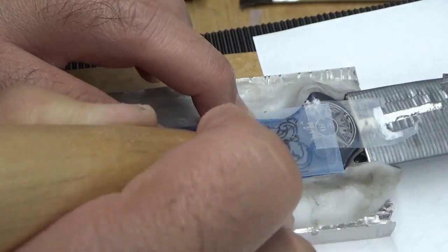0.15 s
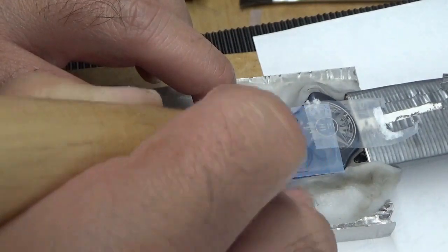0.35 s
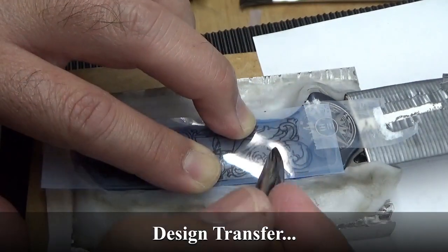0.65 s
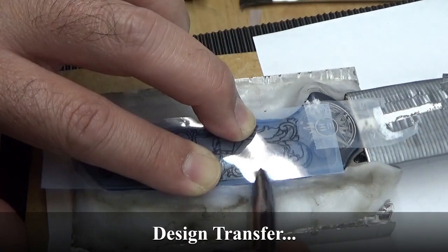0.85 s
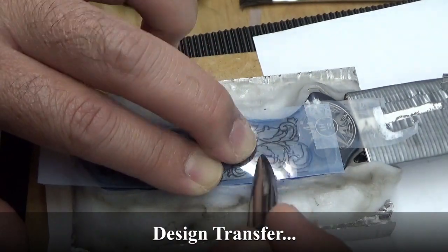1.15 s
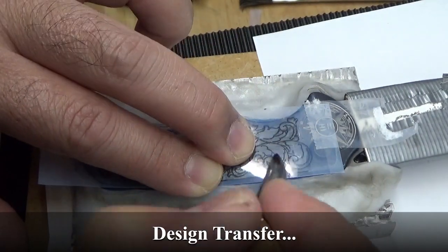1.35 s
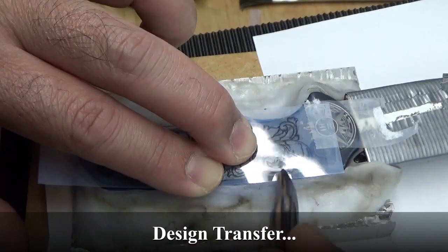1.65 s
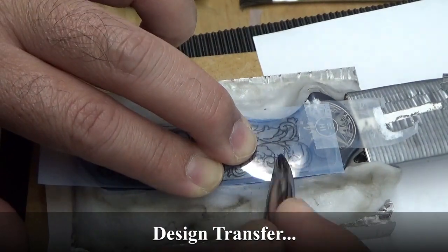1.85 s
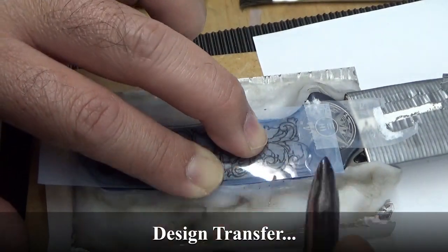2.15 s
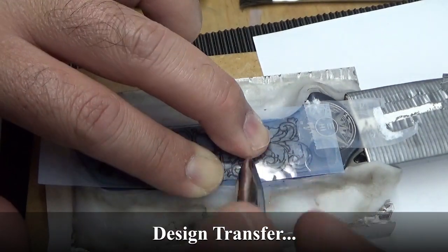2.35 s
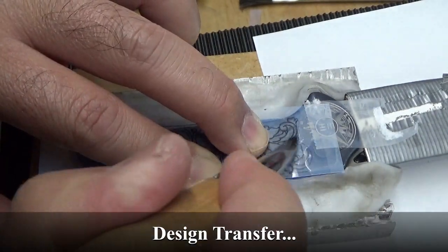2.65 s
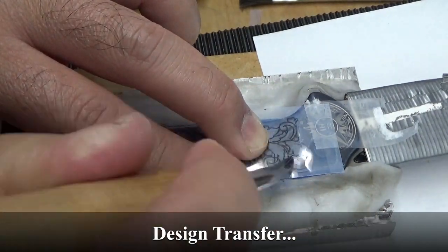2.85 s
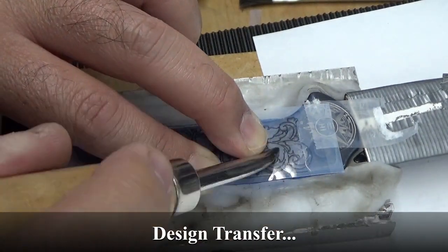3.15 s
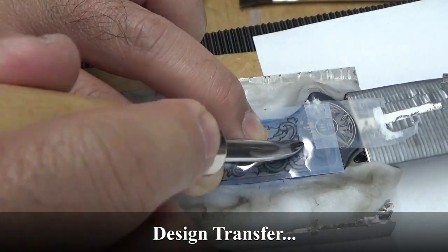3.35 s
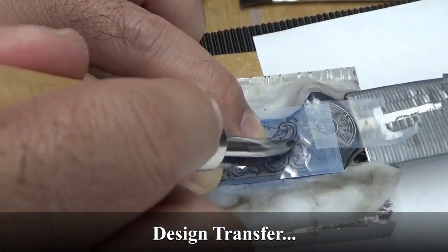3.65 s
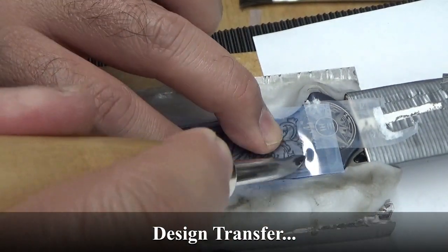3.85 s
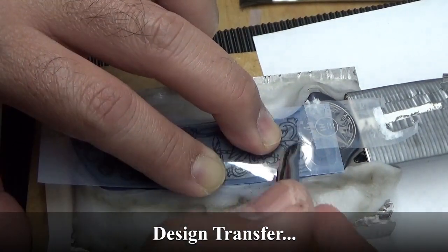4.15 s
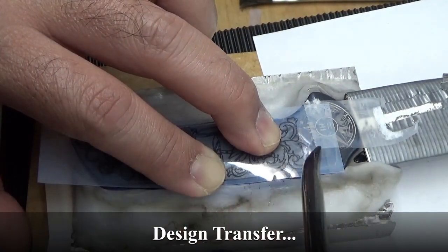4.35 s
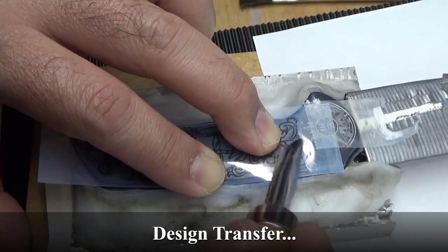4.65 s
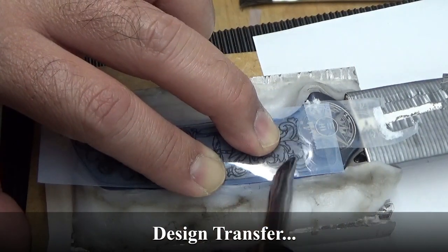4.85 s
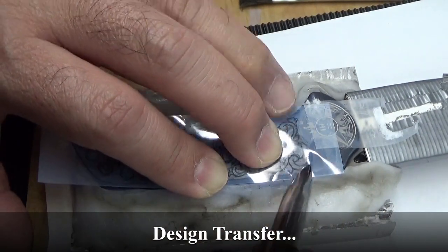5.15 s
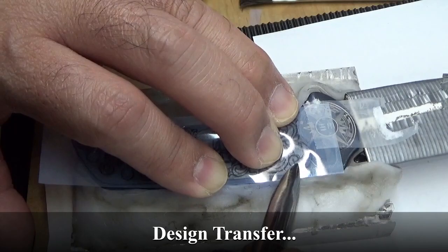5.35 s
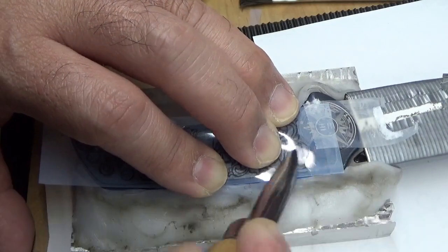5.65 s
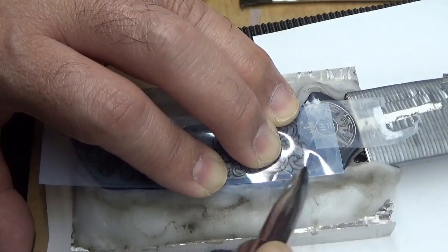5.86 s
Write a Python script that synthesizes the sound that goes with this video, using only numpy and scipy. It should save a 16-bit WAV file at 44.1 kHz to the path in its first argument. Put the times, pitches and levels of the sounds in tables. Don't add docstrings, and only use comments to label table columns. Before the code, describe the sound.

A steel point ticks and hisses across taped plastic film in choppy sped-up bursts, with one hard clack and a later double slap of metal.

```python
import sys
import numpy as np
from scipy import signal
from scipy.fft import rfft, irfft
from scipy.io import wavfile
from scipy.ndimage import uniform_filter1d

SR = 44100
rng = np.random.default_rng(int(sys.argv[2]) if len(sys.argv) > 2 else 0)


def to_wav(s):
    ch = np.atleast_2d(s).T
    pcm = np.round(np.clip(ch, -1, 1) * 32767)
    wavfile.write(sys.argv[1], SR, pcm.astype(np.int16))


def makeup_ratio(level_db):
    decades = np.asarray(level_db, float) / 20
    return 10 ** decades


N = 264600
PIECE_S, FIRST_CUT_S = 1001 / 30000, 0.02312
PAN_DB = -0.6


def evened(x):
    return x / np.sqrt(np.mean(x ** 2) + 1e-20)


def wander(size):
    return evened(uniform_filter1d(rng.standard_normal(N), size))


def read(points, hz):
    f, value = np.transpose(points)
    return np.interp(np.log(hz + 1), np.log(f + 1), value)


def coloured(x, spectrum):
    hz = np.linspace(0, SR / 2, 257)
    taps = signal.firwin2(255, hz, makeup_ratio(read(spectrum, hz)), fs=SR, window=("kaiser", 8))
    taps = taps.reshape((1,) * (x.ndim - 1) + (-1,))
    return signal.oaconvolve(x, taps, "same", axes=-1)


def piece(s):
    return np.floor((s - FIRST_CUT_S) / PIECE_S).astype(int) + 1


def add(reels, s, sound):
    reel = reels[piece(s + 1.5e-3) % 2]
    part = reel[:, round(s * SR):][:, :sound.shape[1]]
    part += sound[:, :part.shape[1]]


def noise(spectrum, likeness, patchy_db, size):
    # pitch_hz, coherence (0-1)
    coherence = [(60, 0.94), (150, 1), (380, 0.72), (950, 0.55), (2380, 0.23), (5980, 0.61), (15000, 0.94)]
    # pitch_hz, left_lead_rad
    phase_lead = [(100, 0), (800, 0.9), (2900, 0.5), (3600, 0.5), (7000, .1)]
    frames = 4 * N // size + 5
    hz = np.fft.rfftfreq(size, 1 / SR)
    a, b, c, d, patches = rng.standard_normal((frames, len(hz), 5)).T
    patches = uniform_filter1d(patches, size // 60, 0)
    patches = evened(uniform_filter1d(patches, 3000 // size + 1, 1))
    same = np.clip(likeness + (1 - likeness) * read(coherence, hz), 0, 1)[:, None]
    left = a + 1j * b
    right = same * left * np.exp(-1j * read(phase_lead, hz))[:, None]
    right = right + np.sqrt(1 - same ** 2) * (c + 1j * d)
    z = np.array([left, right]) * makeup_ratio(read(spectrum, hz)[:, None] + patchy_db * patches)
    reel = evened(signal.istft(z, nperseg=size, noverlap=size - size // 4)[1][:, :N])
    return np.array([reel, np.roll(reel, N // 2, axis=1)])


def ports(direct, scatter, pan_db=0):
    # pitch_hz, left_lead_rad
    near_lead = [(100, .4), (330, 0.91), (1000, 0.32), (2500, 0.27), (6400, .5), (9500, 0.26)]
    hz = np.fft.rfftfreq(len(direct), 1 / SR)
    late = irfft(rfft(direct) * np.exp(-1j * read(near_lead, hz)), len(direct))
    return (np.array([direct, late]) + scatter) * makeup_ratio([[pan_db / 2], [-pan_db / 2]])


def hum():
    t = np.arange(N) / SR
    phase = rng.uniform(0, 2 * np.pi, piece(N / SR) + 1)[piece(t)]
    return makeup_ratio(-68) * np.sqrt(2) * np.sin(2 * np.pi * 120.5 * t + phase)


def room():
    # pitch_hz, density_db (per Hz)
    room_spectrum = [(18, -41), (32, -12), (57, -6.5), (90, -12), (160, -4.5), (390, -11.5),
                     (1110, -15.5), (1800, -21.5), (2750, -18), (3200, -23.5), (4300, -26), (6800, -28),
            (11100, -30.5), (11500, -64.5)]
    return makeup_ratio(-59.5) * noise(room_spectrum, 0, 1.3, size=2048)


def drags():
    # time_s (inside the piece), level_db
    dragged = [(.64, -55.5), (1.21, -51), (1.51, -64.5), (2.24, -61.5), (2.28, -54.5), (2.44, -58),
               (3.28, -62), (3.61, -60), (3.64, -56), (3.68, -59.5), (4.08, -51.5), (4.41, -62.5),
               (4.44, -64.5), (4.54, -52.5), (4.74, -63)]
    # pitch_hz, density_db (per Hz)
    bench = [(60, -19.5), (150, -2.5), (300, 0), (600, -6), (1000, -14), (2500, -23.5), (4000, -50)]
    s, db = np.transpose(dragged)
    gain = np.zeros(piece(N / SR) + 1)
    gain[piece(s)] = makeup_ratio(db)
    lumps = makeup_ratio(3 * wander(300))
    return lumps * gain[piece(np.arange(N) / SR)] * noise(bench, 0.8, 2.0, size=512)


def ring(db, hz, t60, rise):
    t = np.arange(round(PIECE_S * SR)) / SR
    drift = evened(uniform_filter1d(rng.standard_normal(len(t)), 130))
    wobble = 1 + 0.067 * np.minimum(400 / hz, 1) * drift
    shape = (1 - np.exp(-t / max(rise, 1e-4))) ** 2 * makeup_ratio(db - 60 * t / t60)
    return ports(-shape * np.sin(2 * np.pi * hz * np.cumsum(wobble) / SR), 0, -0.8)


def knocks_and_rings(reels):
    # start_s, peak_db, pitch_hz, t60_s
    bench_knocks = [(1.193, -35, 300, .11), (1.218, -30, 309, .14), (1.518, -41, 302, .083),
                    (2.229, -35.5, 200, .052), (2.259, -41.5, 333, .087), (3.617, -45, 300, .08),
                    (2.4254, -38.5, 322, .064), (3.261, -45, 320, .09), (3.594, -43.5, 260, .12),
                    (3.635, -42, 278, .2), (3.649, -28.5, 306, .055), (3.66, -39.5, 274, .077),
                    (4.071, -47, 150, .1), (1.2, -45, 151, .13), (4.059, -34, 301, .062),
                    (4.069, -35.5, 243, .091), (4.41, -42, 282, .094), (4.446, -39.5, 280, .06),
                    (4.5395, -25.5, 322, .13), (4.752, -40.5, 300, .091), (5.177, -39, 293, .056),
                    (5.552, -45.5, 288, .09), (5.648, -43, 293, .08)]
    # start_s, peak_db,
    # pitch_hz, t60_s
    higher_rings = [(1.176, -40, 1450, .015), (1.1765, -41, 2900, .008), (2.2265, -43, 2800, .008),
                    (5.64, -38, 5900, .008), (5.3062, -44, 5900, .01), (5.5533, -48, 3700, .008),
                    (3.618, -42, 6300, .008), (4.203, -54, 9500, .08), (5.3062, -47, 1700, .01),
                    (1.385, -56, 1100, .08), (1.9762, -40, 1250, .012), (2.226, -44, 1400, .015),
                    (2.262, -49, 2490, .035), (2.265, -51, 680, .06), (2.4256, -41, 1830, .04),
                    (2.465, -53.5, 1860, .15), (2.9252, -43, 2550, .015), (3.38, -55, 1100, .08),
                    (3.65, -39, 593, .045), (4.059, -39, 630, .045), (4.071, -43, 560, .04),
                    (4.115, -44, 2690, .05), (4.115, -42, 5550, .03), (4.116, -53, 1800, .06),
                    (4.4915, -41, 1300, .012), (2.925, -46, 1400, .012), (4.96, -52, 2200, .06),
                    (3.0745, -47, 2650, .025), (1.9758, -27, 10800, .009), (1.9762, -29, 5350, .007),
                    (2.427, -55, 5400, .1), (4.547, -39, 3200, .025), (4.5505, -45, 3150, .05),
                    (4.549, -45, 1100, .05), (4.5455, -45, 620, .1), (4.557, -46, 3000, .05),
                    (4.556, -44, 900, .05), (5.25, -56, 1150, .08)]
    rise_cycles = 0.7
    for s, db, hz, t60 in bench_knocks + higher_rings:
        add(reels, s, ring(db, hz, t60, rise_cycles / hz))


def slap(db):
    # pitch_hz, level_db, t60_s
    part_modes = [(900, -19, 0.023), (1350, -10, .014), (1750, -5, 0.011), (2810, -4, 0.014),
                  (2950, -17, .05), (3300, -2.5, 0.0085), (4180, -8, 0.0061), (4670, -5, .008),
                  (5360, -7, 0.0078), (5620, -1, 0.0095), (6710, 1, 0.013), (7400, -7, .009),
                  (8470, 2, 0.0082), (10200, -24, .008)]
    t = np.arange(1000) / SR - 1.5e-4
    body = sum(makeup_ratio(d - 60 * t / t60) * np.cos(2 * np.pi * hz * t) for hz, d, t60 in part_modes)
    body *= np.clip(1 + t / 0.00025, 0, 1)
    decay = makeup_ratio(-28 - 60 * t / 0.0089) + makeup_ratio(-33.5 - 60 * t / 0.062)
    crack = rng.standard_normal((2, len(t))) * decay
    return makeup_ratio(db) * ports(-body / abs(body).max(), crack)


def slaps(reels):
    # start_s, peak_db
    slap_blows = [
        (4.5392, -3),
        (4.5421, -9),
        (4.544, -21),
    ]
    for s, db in slap_blows:
        add(reels, s, slap(db))


def tick(db, hz, dull_db, dull_hz, pan_db):
    t = np.arange(900) / SR - 1.2e-3
    snap = np.exp(-(t / 0.000115) ** 2) * np.sin(2 * np.pi * hz * t)
    core = np.exp(-(t / 0.00027) ** 2) * np.sin(2 * np.pi * dull_hz * t)
    snap += makeup_ratio(min(dull_db + 3, 3)) * core
    direct = snap + 0.24 * np.roll(snap, 30)
    decay = makeup_ratio(-18.5 - 60 * np.arange(600) / SR / 0.012)
    mid, side = rng.standard_normal((2, 1, 600)) * decay
    taps = mid + 0.4 * side * [[1], [-1]]
    tail = signal.fftconvolve(snap[None], taps, axes=1)[:, :len(t)]
    return makeup_ratio(db - 2) * ports(direct, tail, pan_db)


def clack(reels):
    # start_s, peak_db, pitch_hz, core_db, core_hz, pan_db
    hard_blow = (.6474, -4, 10300, -15, 4700, -5.5)
    # start_s, peak_db, pitch_hz, t60_s, rise_s
    blow_rings = [(.639, -41, 1890, .064, .001), (.639, -41, 1100, .08, .001),
                  (.6455, -30, 9000, .02, .0008), (.6468, -23, 2280, .01, .0003),
                  (.6478, -21, 1500, .011, .0004), (.648, -23, 900, .012, .0004),
                  (.6512, -23, 2000, .012, .0005), (.6482, -11, 9200, .008, .0003),
                  (.6495, -18, 6050, .012, .0004), (.6515, -25, 5200, .014, .0004),
                  (.6508, -9, 350, .12, .0011), (.6498, -23, 165, .064, .002),
                  (.6479, -3, 9850, .0065, .0003), (.648, -14, 7770, .0087, .0004),
                  (.648, -15, 3050, .0093, .00035), (.651, -18, 900, .012, .0005),
                  (.6484, -24, 10650, .006, .0003), (.6514, -13, 1230, .0081, .0006),
                  (.6515, -13, 2615, .009, .00084)]
    add(reels, hard_blow[0], tick(*hard_blow[1:]))
    for s, *row in blow_rings:
        add(reels, s, ring(*row))


def snaps_and_ticks(reels):
    # start_s, peak_db, pitch_hz, core_db, core_hz
    louder_ticks = [(.0221, -25, 9900, -20, 4200), (.628, -23, 8600, -21, 3000),
                    (1.1761, -16.5, 9600, -20, 4600), (1.9748, -14, 8000, -18, 4050),
                    (2.0394, -33, 6830, -22, 3550), (2.2258, -20, 9600, -21, 5600),
                    (2.2577, -36, 9210, -9, 2480), (2.925, -22, 10000, -11, 5800),
                    (3.0756, -27, 9000, -25, 2900), (3.6174, -24, 10000, -20, 3600),
                    (4.1144, -25, 9040, -15, 3600), (4.4144, -32, 9900, -22, 3200),
                    (4.491, -21.5, 9000, -21, 3300), (4.9316, -36, 9280, -12, 4600),
                    (5.0768, -25, 9100, -20, 4000), (5.0887, -23.5, 8600, -16, 3600),
                    (5.3056, -34, 9600, -15, 3700), (5.5525, -31, 10400, -10, 5800),
                    (5.5545, -36, 10400, -14, 5900), (5.6395, -29, 9000, -15, 2100),
                    (5.7019, -29, 9800, -9, 6400), (5.7279, -19, 7700, -13, 3500)]
    # start_s, peak_db, pitch_hz, core_hz
    further_ticks = [(.2003, -36, 9000, 4200), (.588, -36.5, 7040, 4870), (.596, -37.5, 8800, 3040),
                     (1.526, -35, 7900, 3100), (.6508, -17, 7500, 4500), (2.4244, -40, 6200, 2270),
                     (1.512, -43, 6700, 2500), (3.015, -43, 8330, 2540), (3.1906, -39, 5900, 9300),
                     (3.6223, -42.5, 6700, 2980), (3.8762, -35, 9200, 7000), (3.8805, -34.5, 8650, 4370),
                     (3.9784, -39, 7800, 3800), (4.1964, -46, 9720, 5680), (4.2024, -45, 7000, 6000),
                     (4.506, -45, 4500, 2600), (5.272, -37, 8900, 6000), (5.656, -41, 8500, 6500),
                     (5.8607, -46, 9090, 2970), (5.9608, -41, 7270, 3910)]
    small = [(s, db, hz, -15, core_hz) for s, db, hz, core_hz in further_ticks]
    for s, *row in louder_ticks + small:
        add(reels, s, tick(*row, PAN_DB + 1.5 * rng.standard_normal()))


def in_band(real, imaginary, hz, t):
    return ((real + 1j * imaginary) * np.exp(2j * np.pi * hz * t)).real


def creak(db, hz, low_hz):
    width_hz, t60_s, low_db = 1800, 0.011, -6
    t = np.arange(500) / SR
    r = np.exp(-np.pi * width_hz / SR)
    a, b, c, d = signal.lfilter([1], [1, -2 * r, r * r], rng.standard_normal((4, len(t))))
    fizz = evened(in_band(a, b, hz, t)) + makeup_ratio(low_db) * evened(in_band(c, d, low_hz, t))
    shape = np.minimum(t / 0.0003, 1) * makeup_ratio(db - 3 - 60 * t / t60_s)
    return ports(shape * fizz, 0, PAN_DB)


def creaks(reels):
    # start_s, peak_db, pitch_hz, low_pitch_hz
    film_slips = [(.7955, -43, 9000, 7000), (.7985, -46, 9000, 6500), (.8095, -42, 9100, 7400),
                  (.8185, -50, 9200, 7000), (.861, -43, 9000, 4000), (.9502, -51, 6700, 3000),
                  (.9845, -50, 8500, 6400), (1.4905, -48, 9500, 6800), (1.629, -50, 8000, 5000),
                  (1.6529, -51, 10000, 6000), (1.6985, -51, 10500, 7300), (1.705, -46, 10000, 6800),
                  (1.7135, -48, 9000, 3300), (1.7565, -46, 9500, 7000), (1.7645, -49, 9000, 4000),
                  (1.981, -44, 10000, 7200), (2.2325, -47, 10500, 8000), (2.379, -50, 9800, 7000),
                  (2.3855, -49, 9800, 6500), (2.9565, -47, 8500, 4500), (3.0185, -48, 9000, 6000),
                  (3.0745, -41, 9500, 6000), (4.2425, -47, 9800, 7500), (4.2462, -42, 9300, 10600),
                  (4.2508, -43, 9200, 10600), (4.2945, -53, 9250, 7500), (4.3285, -45, 9500, 6000),
                  (4.333, -46, 9640, 6200), (4.3358, -50, 9500, 6000), (4.3398, -44, 9570, 6000),
                  (4.3468, -44, 9500, 6200), (4.3508, -45, 9800, 6000), (4.3592, -46, 8500, 10000),
                  (4.3628, -51, 9300, 7500), (4.4375, -46, 9500, 7000), (5.1945, -48, 9000, 6000),
                  (5.5597, -38, 7500, 10000), (5.658, -46, 9500, 5000)]
    for s, *row in film_slips:
        add(reels, s, creak(*row))


def puff(length, db, hz):
    width = round(SR / 1100)
    t = np.arange(round(length * SR)) / SR
    a, b, grit = rng.standard_normal((3, len(t)))
    band = in_band(uniform_filter1d(a, width), uniform_filter1d(b, width), hz, t)
    sound = evened(band) * makeup_ratio(2.5 * evened(uniform_filter1d(grit, 90)))
    return ports(makeup_ratio(db) * np.sin(np.pi * t / length) * sound, 0)


def puffs(reels):
    # start_s, length_s, level_db, pitch_hz
    fold_songs = [(.66, .04, -57, 8000), (.695, .035, -55, 5400), (.74, .035, -60, 3900),
                  (.825, .04, -56, 8700), (1.22, .04, -61, 4800), (1.595, .03, -62, 5500),
                  (2.26, .035, -58, 9200), (1.485, .03, -62, 6700), (1.525, .04, -61, 6800),
                  (.86, .02, -59, 8500), (4.962, .022, -57, 7300), (1.602, .022, -63, 4200),
                  (2.06, .09, -66, 6700), (2.455, .06, -59, 4400), (2.62, .04, -62, 5500),
                  (4.14, .06, -60, 5000)]
    for s, *row in fold_songs:
        sound = puff(*row)
        reels[:, :, round(s * SR):][:, :, :sound.shape[1]] += sound


def pressed(strokes, spread_db):
    lift_db_per_s = 520
    middle, length, pressure_db, broad_db = np.transpose(strokes)[:, :, None]
    t = FIRST_CUT_S + (np.arange(piece(N / SR) + 1) - 0.5) * PIECE_S
    outside = np.maximum(abs(t - middle) - length / 2 + PIECE_S / 2 - 1e-3, 0)
    db = pressure_db - lift_db_per_s * outside
    db = db + spread_db * rng.standard_normal(len(t))
    power = np.array([makeup_ratio(2 * db).sum(0), makeup_ratio(2 * (db + broad_db)).sum(0)])
    return np.sqrt(power)[:, piece(np.arange(N) / SR)]


def rubs():
    # middle_s, length_s, pressure_db, broad_db (over the fine hiss)
    firm_strokes = [(.64, .033, -60, -.5), (.707, .1, -55, -3.5), (.84, .045, -53.5, -8),
                    (.903, .048, -53.5, -3), (1.108, .03, -57, -1.5), (1.208, .033, -56.5, -5.5),
                    (1.4, .05, -62, -1.5), (1.525, .066, -63.5, -4), (1.608, .033, -63, 2),
                    (1.728, .06, -62, -4), (1.975, .03, -61, .6), (2.042, .03, -58, -1),
                    (2.275, .03, -54.5, -2), (2.394, .064, -66, -2), (2.464, .056, -49.5, -6),
                    (2.943, .03, -65.5, -2.5), (3.21, .03, -65, 2), (4.146, .09, -56, -5),
                    (4.344, .033, -67, -6), (4.497, .066, -58, -10), (4.978, .033, -58.5, -2),
                    (5.06, .04, -63, -5), (5.212, .03, -61, -8), (5.278, .03, -61, -6),
                    (5.378, .03, -59, -6.5), (5.645, .03, -65, -1), (5.728, .066, -63, -1),
                    (5.96, .066, -59, -5)]
    # middle_s, length_s, pressure_db, broad_db
    light_glides = [(.79, .066, -68, -3), (.975, .1, -69.5, -1), (1.24, .033, -66, 2),
                    (1.275, .033, -69, 1), (1.31, .033, -71, -3), (1.357, .066, -67, -6),
                    (1.775, .033, -67, 2), (3.643, .033, -68, -1), (4.444, .033, -66, -1),
                    (5.612, .033, -69, -1), (1.64, .5, -70, -2), (2.14, .1, -70.5, -3),
                    (2.325, .066, -71, -2), (2.509, .033, -66, 4), (2.59, .066, -69.5, 2),
                    (2.645, .04, -66, 3), (2.743, .033, -66, -4), (3.045, .1, -71, -4),
                    (3.277, .033, -71, 2), (4.21, .033, -65.5, -5), (4.36, .17, -71, -4),
                    (4.58, .033, -67, -1), (4.645, .033, -66.5, -2.5), (4.744, .033, -67, -9),
                    (5.01, .166, -66, -4), (5.16, .1, -75, -4), (5.51, .033, -68, -1.5)]
    # pitch_hz, density_db (per Hz)
    tip_hiss = [(1500, -26), (4000, -17), (6800, -2), (8500, 0.5), (10000, 0), (11100, -7.5),
                (11500, -44.5)]
    # pitch_hz, density_db (per Hz)
    flank_hiss = [(500, -19), (1500, -5.5), (2500, -8), (4000, -5), (5500, -5.5), (7000, -9),
                  (11100, -21.5), (11500, -55)]
    crackles_per_s, crackle_size, crackle_s = 260, 0.4, 0.0008
    tip, flank = np.hypot(pressed(firm_strokes, 0), pressed(light_glides, 1.5))
    grain = makeup_ratio(1.2 * wander(120))
    waver = makeup_ratio(1.2 * wander(700))
    fine = 0.92 * tip * noise(tip_hiss, 0.3, 2.1, size=512)
    broad = 1.314 * flank * noise(flank_hiss, 0.46, 2.5, size=512)
    pops = crackle_size * rng.exponential(1, N) * (rng.random(N) < crackles_per_s / SR)
    crackle = 0.93 + signal.lfilter([1], [1, -np.exp(-1 / crackle_s / SR)], pops)
    return crackle * grain * waver * (fine + broad)


def scene():
    # pitch_hz, gain_db
    dull_top = [(11000, 0), (11400, -18.5), (13000, -24.5), (16000, -40)]
    reels = room() + drags() + rubs()
    knocks_and_rings(reels)
    slaps(reels)
    clack(reels)
    snaps_and_ticks(reels)
    creaks(reels)
    puffs(reels)
    reels = coloured(reels, dull_top)
    return np.where(piece(np.arange(N) / SR) % 2, reels[1], reels[0]) + hum()


def top_cut(x):
    return signal.sosfilt(signal.butter(12, 16630, fs=SR, output="sos"), x)


def record(dry):
    # pitch_hz, gain_db
    export_top = [(9000, 0), (13000, 1), (15800, -10.5), (16300, -62.5)]
    return top_cut(coloured(dry, export_top))


dry = scene()
out = record(dry)
to_wav(out)
```